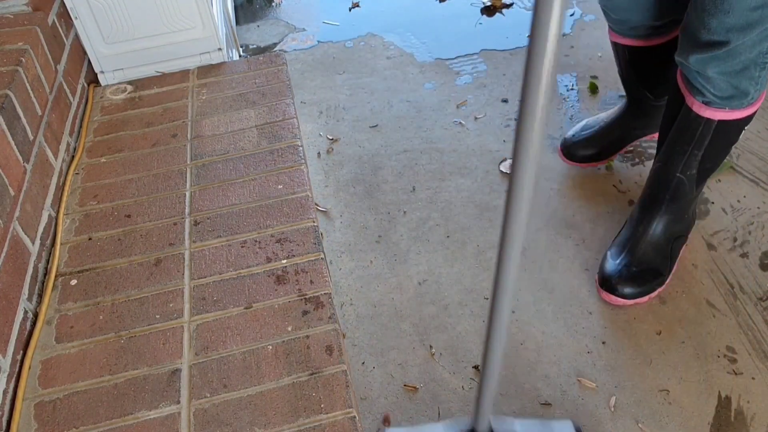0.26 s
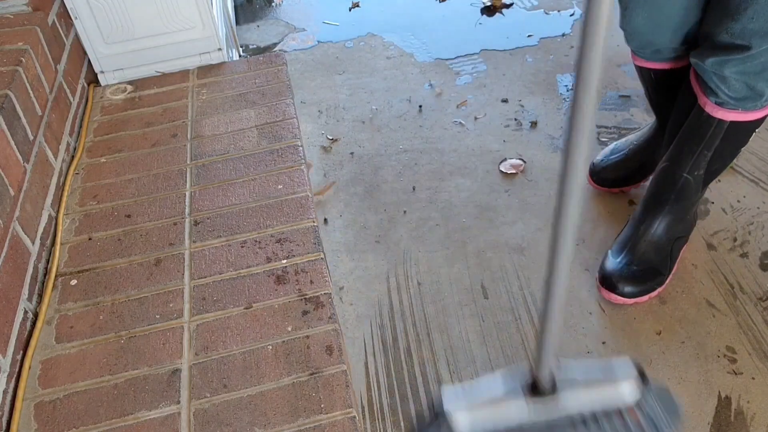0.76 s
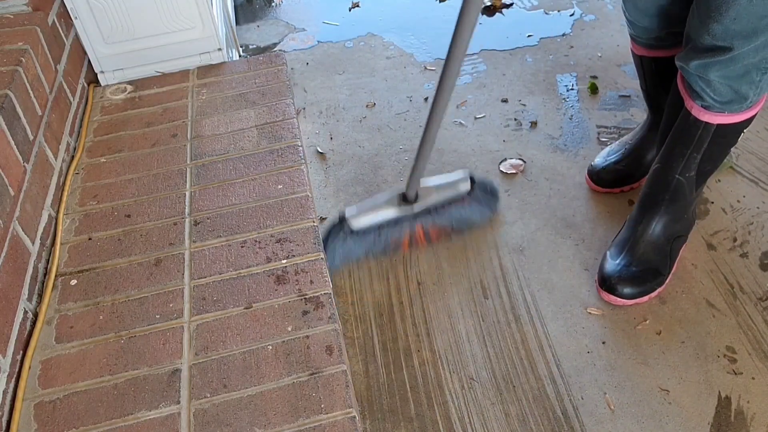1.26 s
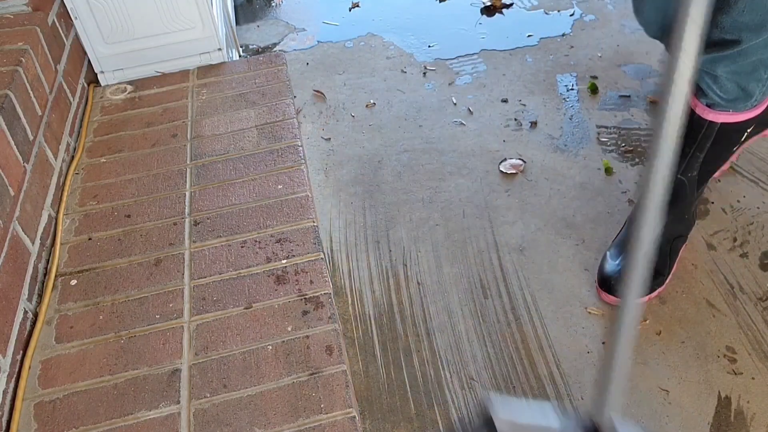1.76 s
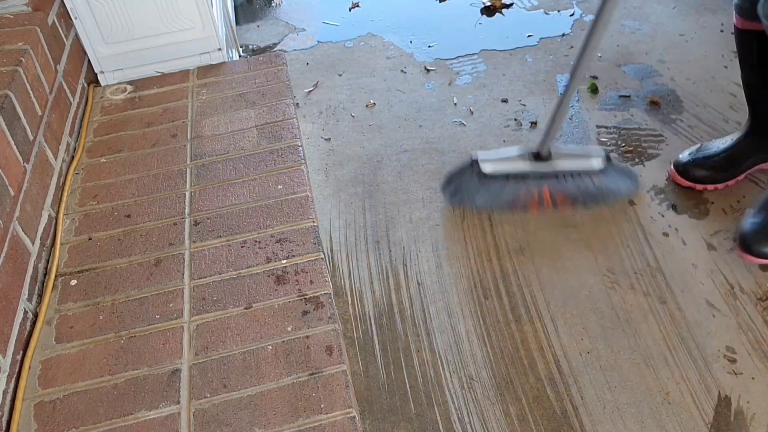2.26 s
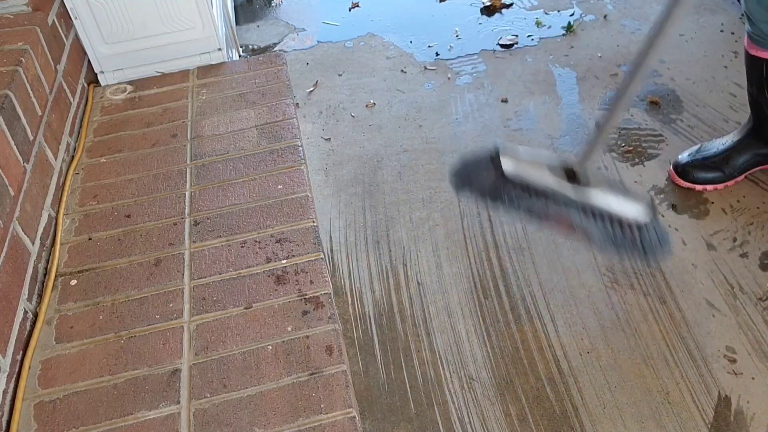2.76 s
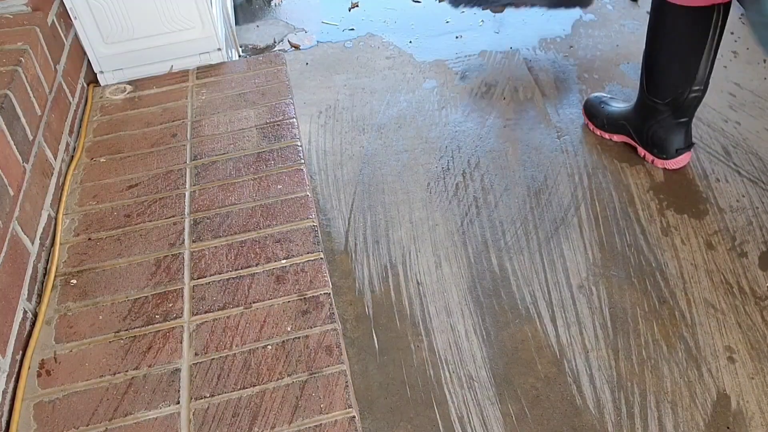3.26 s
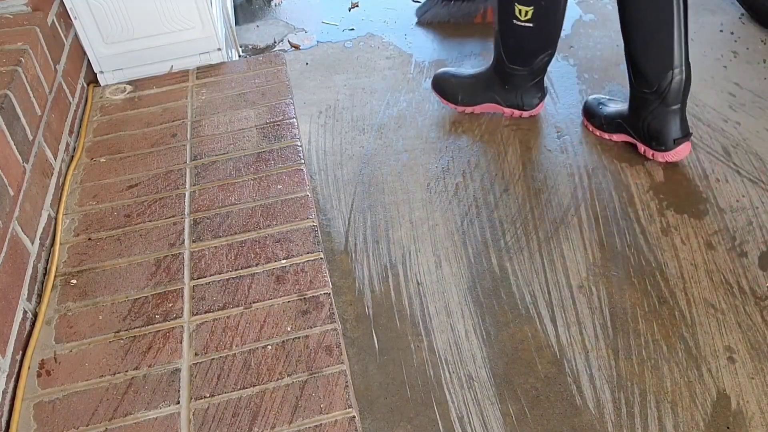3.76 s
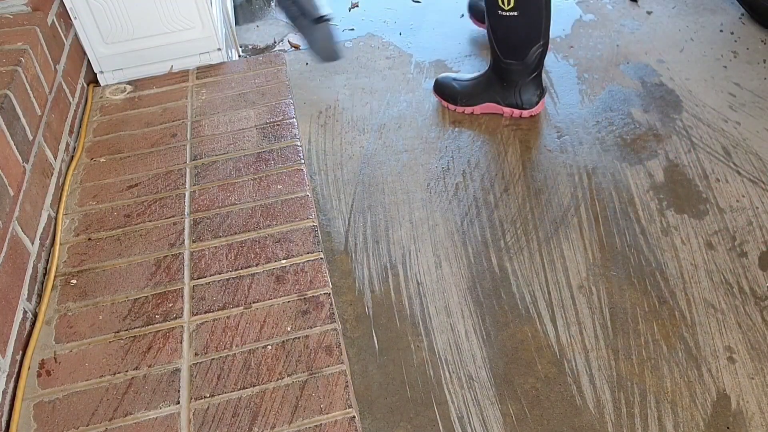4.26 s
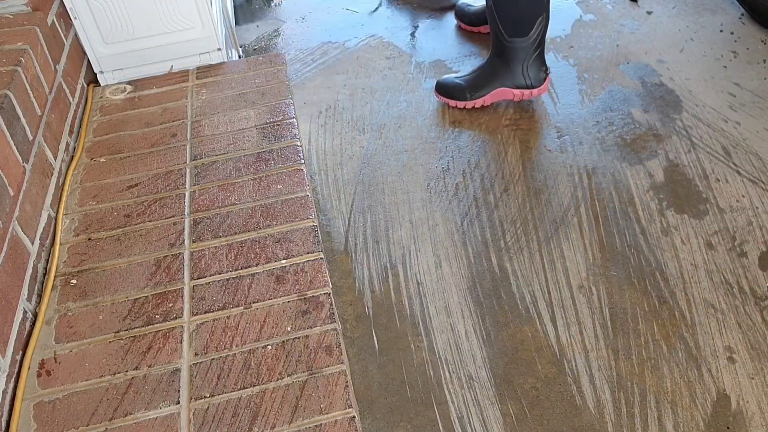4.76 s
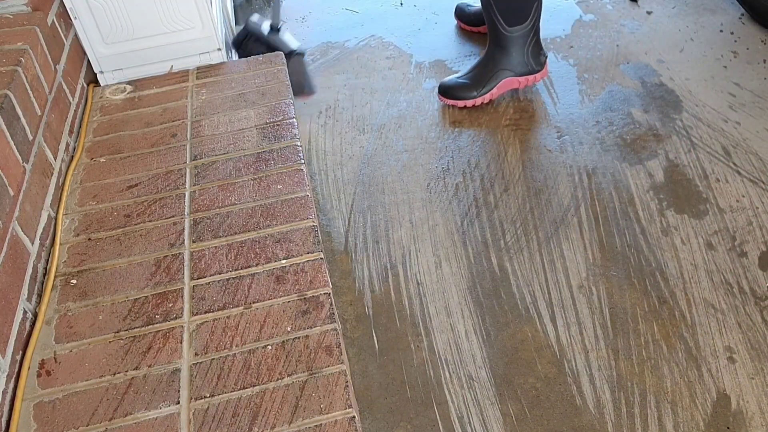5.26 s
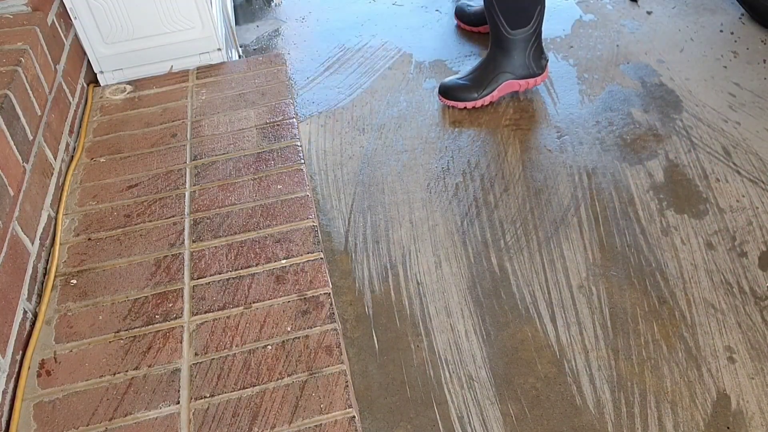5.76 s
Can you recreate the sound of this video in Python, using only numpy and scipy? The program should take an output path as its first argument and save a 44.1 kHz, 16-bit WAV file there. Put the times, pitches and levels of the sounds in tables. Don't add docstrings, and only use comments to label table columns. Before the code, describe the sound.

A push broom sweeps water across a concrete patio, heard close in stereo with short wall reflections. Quiet water drips and low outdoor rumble open it; at 0.4 s bristles land and hiss, swelling until 0.85 s, with a hollow squeaky groan around 0.55 s. The second stroke starts near 1.3 s: the head hits a brick edge, peaking at 1.4 s in a sharp boxy clack, leaning left, with a fast rattle dying by 1.55 s as the scrape continues to 1.7 s. Drops flick around 2.0-2.3 s. A stroke at 2.35 s leads to a bright splash at 2.6 s and another swish, then scattered drops. The sound vanishes for a blink at 3.23 s, returning on a scrape fading by 3.65 s. Another wet stroke runs 3.9-4.3 s with ringing bubbles. A swish from 4.7 s bursts into a strong bubbly splash at 5.1 s. Soft drips, dull thuds around 5.65-5.8 s and a final rising swish close it.

```python
import sys
import numpy as np
from scipy import signal
from scipy.fft import rfft, irfft
from scipy.io import wavfile
from scipy.ndimage import uniform_filter1d

SR = 44100
rng = np.random.default_rng(int(sys.argv[2]) if len(sys.argv) > 2 else 0)


def bounce(signal):
    frames = np.transpose(np.atleast_2d(signal))
    limited = np.clip(frames, -1, 1)
    pcm = np.round(limited * 32767).astype(np.int16)
    wavfile.write(sys.argv[1], SR, pcm)


def voltage_ratio(level):
    return 10 ** (np.asarray(level, float) / 20)


N = 264600

# touch_s, fastest_s, lift_s, hiss_db, slower_ends_db
STROKES = [(0.395, 0.722, 0.84, -44, 7.5), (1.336, 1.53, 1.714, -46, 3.5), (2.352, 2.447, 2.73, -45, 7.5),
           (2.632, 2.686, 2.855, -43, 12.5), (3.25, 3.265, 3.64, -45.5, 31),
           (3.914, 4.126, 4.313, -45.5, 13.5), (4.156, 4.177, 4.186, -49.5, 1.5),
           (4.31, 4.365, 4.395, -52.5, 2.5), (4.728, 5.077, 5.325, -41.5, 21.5),
           (5.11, 5.22, 5.18, -51.5, 22), (5.73, 6.003, 6.54, -42.5, 5.5)]
# start_s, end_s, hiss_db
TRICKLE = [(-.1, 0.373, -71.5), (0.926, 1.301, -65.5), (1.805, 2.3, -69), (2.86, 3.157, -63.5),
           (1.74, 1.79, -62), (3.487, 3.589, -77.5), (3.6, 3.84, -77), (3.846, 3.901, -70.5),
           (4.45, 4.722, -74), (5.28, 5.552, -66), (5.652, 5.668, -55.5)]
# freq_hz, level_db (per Hz)
BRISTLE_COLOUR = [(1120, -23.5), (1900, -15.5), (2400, -14.5), (2660, -17), (3300, -8), (4650, -4.5),
                  (7650, -4.5), (10800, -6), (14900, -2.5), (16100, -6), (16500, -26)]
# freq_hz, left_right_likeness (0 to 1)
HEAD_LIKENESS = [(1000, 0.3), (3000, 0.85), (6000, 0.13), (15000, 0.11)]
# time_s, spray_db (off the bristle tips), wave_db (heaped in front)
WATER_DEPTH = [(0, 5.5, 6), (.33, 5.5, 5.5), (.39, 1.5, -8), (.8, -1.5, -8), (1, 2.5, 0), (1.45, -0.5, -4),
               (1.75, -5, -8), (2.2, 6, 6), (2.45, 0, -11.5), (2.8, 0, -6.5), (2.9, 3.5, -1), (3.2, 3.5, 0),
               (3.3, 1.5, -13), (4.08, 0, -13), (4.16, 3, -1.5), (4.27, 7, 5), (4.4, 4.5, 0),
               (4.9, 3, -9.5), (5.2, 5, -5.5), (5.8, 3, -12.5)]
# freq_hz, level_db, t60_s
HUM_MODES = [(1452, -17, 0.08), (1550, -4, 0.075), (1640, -13, 0.08)]
# peak_s, level_db, fall_s (time to lose 10 dB)
PRESSES = [(.385, -58, 0.017), (.44, -59.5, 0.04), (.55, -51, 0.028), (.635, -57, 0.016),
           (.72, -60.5, 0.12), (1.31, -58, 0.036), (1.372, -44, 0.026), (1.44, -52.5, 0.077),
           (1.716, -65.5, 0.088), (2.262, -54.5, 0.013), (2.47, -67, 0.088), (2.6, -63, 0.16),
           (2.77, -63, 0.091), (3.275, -56.5, 0.032), (3.4, -68, 0.1), (3.88, -69, 0.036),
           (3.92, -62, 0.032), (3.967, -57.5, 0.025), (4.03, -70, 0.044), (4.79, -63, 0.017),
           (4.825, -66, 0.028), (4.95, -68, 0.21)]
# time_s, pitch_hz
SQUEAK = [(.4, 1530), (.52, 1550), (.6, 1560), (.64, 1510), (.8, 1580), (1.27, 1545), (1.35, 1480),
          (1.4, 1580), (1.47, 1650), (1.55, 1540), (2.3, 1550), (3.3, 1555), (3.86, 1500), (3.92, 1525),
          (3.97, 1555), (4.04, 1505), (4.8, 1550), (6, 1550)]
# peak_s, level_db, fall_s (time to lose 10 dB), pitch_hz
GROANS = [
    (.548, -54, .035, 590),
    (.55, -64, .025, 670),
    (.556, -45, .026, 1546),
    (.597, -50, .018, 1549),
    (1.3, -56, .025, 1545),
    (3.965, -56, .03, 1550),
]
# start_s, peak_db, pitch_hz,
# t60_s, ring_over_spray_db
FLICKS = [(.296, -58, 10300, .03, 12), (.369, -41, 7300, .06, 0), (0.376, -35, 13500, 0.06, -5),
          (.425, -43, 7400, .15, 14), (.449, -38, 4470, .05, 12), (.483, -37, 7000, .07, 10),
          (0.96, -44, 11900, 0.038, -12), (1.0145, -47, 3670, 0.039, -4), (1.129, -41.5, 4640, 0.11, 3),
          (1.316, -43, 7700, 0.069, -12), (1.8702, -46, 2880, 0.052, 1), (2.0203, -37.5, 5350, 0.033, -10),
          (2.069, -55, 4260, .085, 0), (2.113, -44.5, 7100, 0.037, -27), (2.254, -39, 8000, .04, -10),
          (2.258, -33.5, 11600, 0.088, -13), (2.356, -52, 6630, .064, -4), (2.585, -45, 1600, .1, 14),
          (2.73, -50, 1500, .1, 14), (2.838, -35, 7150, 0.12, -15), (2.921, -33, 5600, 0.035, 10),
          (2.937, -39, 5720, .06, 11), (3.048, -58, 6000, 0.057, -1), (3.0674, -50, 5610, 0.055, 0),
          (3.12, -38.5, 5980, 0.059, -15), (4.31, -37.5, 4800, 0.07, 9), (4.4783, -47, 5850, 0.17, -6),
          (4.716, -49, 3050, .04, 16), (5.07, -44, 1550, .16, 16), (5.1, -47, 1300, .1, 18),
          (5.377, -47.5, 6000, .06, 3), (5.443, -45, 7200, .09, 8), (5.51, -52, 6000, .15, 16),
          (5.63, -50, 2500, .05, 14), (5.654, -44.5, 2300, .04, 14), (5.678, -43.5, 2200, .06, 14),
          (5.639, -50, 4000, .06, -7), (5.6452, -36.5, 4020, 0.11, -7)]
# start_s, peak_db, pitch_hz, t60_s, ring_over_spray_db
SPLASHES = [(2.55, -30, 7400, 0.16, -16), (2.563, -27, 5000, .12, -8), (2.578, -21.5, 8700, 0.086, -11),
            (2.591, -19, 5000, 0.059, -6), (2.586, -23, 5500, 0.068, 1), (2.597, -21, 6030, 0.033, 3),
            (2.58, -44.5, 2120, 0.092, 13), (2.676, -45, 2150, 0.23, 16), (2.67, -38, 4300, .25, 12),
            (2.676, -31.5, 6300, 0.085, 9), (2.684, -29.5, 7400, 0.073, 9), (2.855, -38, 3900, 0.2, 4),
            (4.099, -40, 5700, 0.17, 13), (4.147, -41, 2100, 0.1, 17), (4.175, -38.5, 3340, 0.18, 12),
            (4.211, -41, 3100, 0.18, 16), (4.24, -34.5, 5730, 0.08, 12), (4.252, -36, 4200, 0.12, 9),
            (4.3, -47, 2190, 0.15, 14), (4.312, -48.5, 1570, 0.1, 19), (4.34, -40.5, 5600, 0.26, 16),
            (4.348, -37.5, 7800, 0.18, 19), (5.004, -28, 6540, 0.09, 10), (5.006, -30.5, 7700, 0.27, 20.5),
            (5.02, -36, 5200, .15, 7), (5.044, -27.5, 7600, .12, 12), (5.048, -25, 5250, 0.1, 13),
            (5.057, -26.5, 7550, 0.04, 14), (5.059, -19, 5000, 0.042, 14), (5.05, -35, 2280, 0.13, 12),
            (5.075, -32, 3330, 0.18, 19), (5.095, -38, 2380, 0.076, 17), (5.0971, -17, 6100, 0.016, 11),
            (5.107, -26, 5500, .03, 18), (5.123, -31.5, 5270, .06, 12), (5.2, -37, 5500, .04, 14),
            (5.262, -47, 3050, .03, 19), (5.24, -44, 3100, 0.4, 11), (5.36, -56, 5200, 0.08, 15)]
# start_s, peak_db, upper_over_lower_modes_db, rise_s, main_mode_hz
KNOCKS = [(1.3408, -17, -8, 0.00078, 1440), (1.344, -28, 13, 0.0019, 1460), (1.3473, -30, 8, 0.0019, 1560),
          (1.353, -32, 4, 0.0021, 1430), (1.359, -33, 0, 0.0022, 1480), (1.3645, -26, -1, 0.002, 1500),
          (1.3719, -24, 15, 0.0011, 1514), (1.3813, -30, -6, 0.0015, 1570),
          (1.387, -30.5, 13, 0.0015, 1570), (1.392, -30.5, 10, .0015, 1565),
          (1.396, -26.5, 16, 0.0022, 1606), (1.4032, -19.5, -2.5, 0.00055, 1555),
          (1.4057, -8, 18.5, .0012, 1543), (1.409, -16, 14, 0.00084, 1567), (1.4205, -26, 18, 0.0013, 1704),
          (1.434, -26, 6.5, 0.001, 1500), (1.4395, -30, 11, 0.0013, 1690),
          (1.4523, -32.5, 16, 0.0015, 1658), (1.4564, -28.5, 14, 0.0013, 1635),
          (1.467, -33, 19, 0.0025, 1680), (1.471, -33, -8, 0.0015, 1540), (1.482, -40, 12.5, 0.0023, 1610),
          (1.494, -37.5, 13, 0.0029, 1495), (1.503, -43, 14, .003, 1560), (1.516, -41, 16, 0.0029, 1660),
          (1.529, -42, 16, .003, 1570), (1.545, -47, 17, .004, 1610), (4.77, -48, 0, 0.0023, 1600),
          (5.664, -45, -4, 0.0023, 1600), (5.671, -49, 0, .002, 1760)]
# freq_hz, level_db, t60_s
HEAD_MODES = [(170, -14, 0.047), (276, -16, 0.037), (425, -11, 0.057), (527, -20, 0.027), (650, 0, 0.028),
              (740, 0, 0.018), (883, -3, 0.026), (1000, -4, 0.022), (1175, -14, 0.014), (1370, -18, 0.025),
              (1555, 3, 0.03), (1650, -4.5, .022), (1795, -15.5, 0.038), (1922, -12, 0.03),
              (2217, -23, 0.029), (2620, -18, 0.03), (3130, -18, 0.017), (3350, -22, .02),
              (3840, -20, 0.047), (4320, -26.5, 0.027), (5000, -28.5, 0.011), (5600, -20.5, 0.018)]
# start_s, peak_db, pitch_hz
THUDS = [(0.459, -45, 177), (.523, -44, 199), (1.15, -48, 422), (1.344, -31, 425), (1.351, -34, 400),
         (1.37, -39, 400), (1.42, -39, 392), (3.109, -43, 167), (4.089, -55.5, 175.4), (4.149, -44, 200),
         (4.201, -49, 171), (4.759, -46, 503), (4.767, -50.5, 400), (5.478, -53, 330), (5.525, -53, 350),
         (5.642, -44, 560), (5.664, -46, 820), (5.68, -48, 650), (5.646, -40, 139.8), (5.654, -41.5, 526),
         (5.659, -34, 188), (5.676, -43, 192), (5.693, -46, 200), (5.71, -41, 170), (5.732, -57, 587),
         (5.735, -45, 81), (5.758, -31, 67.6), (5.791, -43, 71.6)]
# time_s, left_over_right_db
PAN = [(0, 1.5), (1.3, 1), (1.36, 8), (1.5, 1), (2.5, .5), (2.6, 4.5), (2.7, 0.5), (4.4, 0.5), (6, 1)]
# time_s, lag_samples
LAG = [(0, 5), (1, 8), (2, 7), (3.2, 7), (3.3, 5), (4.3, 4), (4.7, 0), (6, -1)]
# freq_hz, t60_s
WALLS = [(200, 0.17), (1000, 0.32), (4000, 0.14), (12000, 0.058)]
# peak_s, level_db, fall_s (time to lose 10 dB)
GUSTS = [(.05, -52, 0.4), (.14, -45, 0.24), (.3, -44.5, 0.04), (.5, -45, 0.15), (.72, -74, 3.5),
         (.82, -53.5, 0.4), (.97, -44, -0.25), (1.35, -54.5, 0.5), (1.55, -49, 0.2), (1.71, -46, 0.15),
         (1.87, -51.5, 0.27), (2.09, -49, 0), (2.2, -48.5, 0.16), (2.39, -45, -0.19), (2.51, -52.5, 0.17),
         (2.76, -49.5, 0.17), (3.2, -49, 0.36), (3.4, -56, 0.6), (3.63, -59, 0.5), (3.81, -56.5, 0.4),
         (4.3, -53.5, 0.37), (4.7, -56, 0.24), (4.86, -50.5, 0.3), (5.31, -48.5, 0.22), (5.55, -71, 2),
         (5.67, -55, 0.14), (5.78, -44.5, 0.27), (5.89, -60, -2.5)]
# freq_hz, level_db (per Hz)
RUMBLE_COLOUR = [(8.8, -41), (15, -19), (32, -9), (54, 8.5), (108, -5.5), (135, -10.5), (200, -20.5),
                 (260, -29.5), (440, -120)]
# freq_hz, level_db (per Hz)
WASH_COLOUR = [(76, -29), (130, -5), (162, -19.5), (199, -10.5), (281, -6), (324, -1), (457, -12),
               (516, -6), (860, -11), (1120, -17.5), (1450, -14.5), (1780, -15.5), (3680, -17),
               (15200, -40.5), (16500, -52)]
# freq_hz, left_right_likeness (0 to 1)
YARD_LIKENESS = [(60, .55), (180, .58), (550, .45), (1650, .1), (5000, .1), (15000, .1)]
# freq_hz, left_over_right_db
TILT = [(40, 1), (300, -1.5), (600, -1), (2000, 0.5), (8000, -0.5), (13000, 2)]
# start_s, end_s
DROPOUT = (3.222, 3.2625)


def sweep():
    bristles = voltage_ratio(4.8) * noise(BRISTLE_COLOUR, HEAD_LIKENESS, patchy_db=1.7, flicker_db=1.0)
    bristle_ring = voltage_ratio(-9.0) * bubbles(7150, 7610, 70, 120, 3.0, drift=.008, count=3)
    return contact() * (bristles + bristle_ring + pushed_water()) + ports(head_hum())


def contact():
    land_db_per_s, lift_db_per_s, drain_db_per_s = 702, 246.5, 119
    t = np.arange(0, N, 16) / SR
    power = 1e-9
    for touch, fastest, lift, db, ends_db in STROKES:
        slowness = np.interp(t, [touch, fastest, lift], [1, 0, 1])
        away_db = land_db_per_s * np.maximum(touch - t, 0) + lift_db_per_s * np.maximum(t - lift, 0)
        power = power + voltage_ratio(2 * (db - ends_db * slowness ** 1.044 - away_db))
    for start, end, db in TRICKLE:
        away_db = land_db_per_s * np.maximum(start - t, 0) + drain_db_per_s * np.maximum(t - end, 0)
        power = power + voltage_ratio(2 * (db - away_db))
    return np.interp(np.arange(N) / SR, t, np.sqrt(power))


def pushed_water():
    fizz = np.sqrt(np.maximum(voltage_ratio(2 * along(WATER_DEPTH)) - voltage_ratio(2 * 0.5), .002))
    slosh = np.sqrt(np.maximum(voltage_ratio(2 * along(WATER_DEPTH, column=2)) - voltage_ratio(2 * -8.5), .001))
    small = bubbles(3565, 9290, 45, 3000, 3.1, count=12)
    big = bubbles(1300, 5847, 24, 1500, 3.2, count=12)
    return fizz * small + slosh * big


def bubbles(low_hz, high_hz, cycles, per_s, spread_db, drift=.05, count=20):
    out = np.zeros((2, N))
    size = voltage_ratio(spread_db * np.minimum(rng.exponential(1, N), 4)) * (rng.random(N) < per_s / SR)
    kind = rng.integers(0, count, N)
    places = rng.integers(-5, 6, count)
    share = signal.windows.tukey(count + 2, .95)[1:-1]
    for k, hz in enumerate(np.geomspace(low_hz, high_hz, count)):
        age = np.arange(1400) / SR * hz / cycles
        ring = (1 - np.exp(-12 * age)) * np.exp(-3 * age)
        ring *= np.sin(2 * np.pi * cycles * age * (1 + 0.016 * age))
        ring = share[k] * ring / np.linalg.norm(ring)
        pops = signal.oaconvolve(np.float32(size * (kind == k)), np.float32(ring))[:N]
        out += [pops, np.roll(pops, places[k])]
    n = np.arange(N)
    warp = n.astype(float)
    for hz in (2.3, 5.9, 9.1):
        warp += drift * SR / (2 * np.pi * hz) * np.sin(2 * np.pi * (hz * n / SR + rng.random()))
    left, right = [np.interp(warp, n, side) for side in out]
    return evened(np.array([left, ports(right)[1]]))


def head_hum():
    unevenness = evened(uniform_filter1d(rng.standard_normal(N), 600))
    scrape = voltage_ratio(2.3 * unevenness) * rng.standard_normal(N)
    t = np.arange(3000) / SR
    ring = sum(voltage_ratio(db - 60 * t / t60) * np.sin(2 * np.pi * hz * t) for hz, db, t60 in HUM_MODES)
    hum = evened(signal.oaconvolve(scrape, ring)[:N])
    hum /= np.sqrt(abs(uniform_filter1d(hum ** 2, 1200)) + .5)
    wander = 1 + .003 * evened(uniform_filter1d(scrape, 900) - uniform_filter1d(scrape, 6000))
    clock = np.float32(np.cumsum(wander) / SR)
    squeak = np.sin(2 * np.pi * np.cumsum(along(SQUEAK) * wander) / SR)
    out = (voltage_ratio(-2) * hum + voltage_ratio(-3.5) * squeak) * swells(PRESSES, lean=1.04)
    for s, db, fall_s, hz in GROANS:
        out += swells([(s, db, fall_s)], lean=0.88) * np.sin(np.float32(2 * np.pi * hz) * clock)
    return out


def flicks():
    return thrown_water(FLICKS, pitch_width=0.21, rise_s=.003)


def splashes():
    return thrown_water(SPLASHES, pitch_width=0.17, rise_share=0.042)


def thrown_water(rows, pitch_width, rise_s=0, rise_share=0):
    out = np.zeros((2, N))
    t = np.arange(6144) / SR
    hz = np.fft.rfftfreq(6144, 1 / SR)
    for s, db, pitch_hz, t60, ring_db in rows:
        spray = rng.standard_normal((2, 6144))
        lumps = voltage_ratio(3.0 * evened(uniform_filter1d(spray[1, :len(hz)], 36)))
        patch = np.exp(-(np.log((hz + 1) / pitch_hz) / pitch_width) ** 2)
        colour = voltage_ratio(read(BRISTLE_COLOUR, hz)) + voltage_ratio(ring_db) * patch * lumps
        rise = max(rise_s + rise_share * t60, 2e-4)
        shape = (1 - np.exp(-(t / rise) ** 2)) * voltage_ratio(-60 * t / max(t60, .01))
        spray[1] = 0.065 * np.roll(spray[0], round(lag_at(s))) + 0.9 * spray[1]
        burst = evened(irfft(rfft(spray) * colour))
        add(out.T, s, (voltage_ratio(db - 7.5) * shape / shape.max() * burst).T)
    return out


def knocks():
    out = np.zeros((2, N))
    t = np.arange(2000) / SR
    hz, db, t60 = np.transpose(HEAD_MODES)[:, :, None]
    for s, peak_db, hard_db, rise, main_hz in KNOCKS:
        luck = rng.standard_normal((4, len(HEAD_MODES), 1))
        hardness_db = .5 * hard_db * np.tanh((hz - 1250) / 250)
        level = voltage_ratio(db + 1.24 * luck[0] + hardness_db - 60 * t / t60)
        detune = np.where(abs(hz - 1600) < 250, main_hz / 1555, 1 + .02 * luck[1])
        late = (7 + 4 * luck[2] * (hz > 1800)) / SR
        smear = 900 * max(rise - .0008, 0) * luck[3]
        sides = []
        for delay in (0, late):
            modes = level * np.sin(2 * np.pi * hz * detune * (t - delay) + smear)
            sides.append(modes.sum(0))
        rise = max(rise, 2e-4)
        ring = np.array(sides) * (1 - np.exp(-(t / rise) ** 2))
        crack = .8 * uniform_filter1d(rng.standard_normal((2, len(t))), size=5, axis=1)
        crack *= np.exp(-t / 0.007) * min(0.0012 / rise, 1)
        add(out.T, s, voltage_ratio(peak_db) * (ring / abs(ring[0]).max() + .19 * crack).T)
    return out


def thuds():
    out = np.zeros(N)
    t = np.arange(4096) / SR
    hz = np.fft.rfftfreq(4096, 1 / SR)
    for s, db, pitch_hz in THUDS:
        puff = rng.standard_normal(4096)
        puff = evened(irfft(rfft(puff) / (1 + (hz / 600) ** 1.2) * (hz > 120)))
        bump = np.sin(2 * np.pi * pitch_hz * t) + 0.3 * min(pitch_hz / 170, 1) ** 3 * puff
        fade = (1 - np.exp(-t / 0.00075)) * np.exp(-t / 0.016)
        add(out, s, voltage_ratio(db - 2.5) * fade * bump)
    return out


def patio(x):
    taps = np.zeros((6, 16000))
    at = np.arange(100, 15900, 20) + rng.integers(0, 20, (6, 790))
    np.put_along_axis(taps, at, rng.choice([-1., 1.], at.shape), 1)
    hz, t, z = signal.stft(taps, SR, nperseg=256)
    z = z * voltage_ratio(-60 * t / read(WALLS, hz)[:, None])
    tail = signal.istft(z, SR, nperseg=256)[1][:, :10000]
    tail = np.float32(tail / np.linalg.norm(tail[0]))
    phase = 7 * np.arange(N) / SR + np.arange(3)[:, None] / 3
    turns = np.cos(2 * np.pi * phase) * np.sqrt(2 / 3)
    sent = np.float32(np.tile(x * turns, (2, 1)))
    echo = signal.oaconvolve(sent, tail, axes=1)[:, :N]
    return echo.reshape(2, 3, N).sum(1)


def yard():
    rumble = noise(RUMBLE_COLOUR, YARD_LIKENESS, patchy_db=1.5, flicker_db=0, size=2048)
    rumble /= np.sqrt(uniform_filter1d((rumble ** 2).mean(0), 3000) + 0.23)
    gusts = np.hypot(swells(GUSTS, lean=1.43), voltage_ratio(-62.5))
    wash = noise(WASH_COLOUR, YARD_LIKENESS, patchy_db=2.1, flicker_db=1.0, size=1024)
    return gusts * rumble + voltage_ratio(-58.5) * wash


def noise(colour, likeness, patchy_db, flicker_db, size=512):
    frames = N * 4 // size + 5
    hz = np.fft.rfftfreq(size, 1 / SR)
    a, b, c, d, patches = rng.standard_normal((frames, len(hz), 5)).T
    patches = evened(uniform_filter1d(uniform_filter1d(patches, 8, 0), 12, 1))
    flicker = evened(uniform_filter1d(rng.standard_normal(frames), 3))
    lag_samples = lag_at(np.arange(frames) * size / 4 / SR)
    late = np.exp(-2j * np.pi * np.outer(hz / SR, lag_samples))
    same = np.clip(read(likeness, hz), -1, 1)[:, None]
    left = a + 1j * b
    z = np.array([left, same * late * left + np.sqrt(1 - same ** 2) * (c + 1j * d)])
    z *= voltage_ratio(read(colour, hz)[:, None] + patchy_db * patches + flicker_db * flicker)
    sound = signal.istft(np.complex64(z), nperseg=size, noverlap=size * 3 // 4)[1]
    return evened(sound[:, :N])


def ports(x):
    n = np.arange(N)
    heard = n - np.round(lag_at(n / SR)).astype(int)
    return np.array([x, x[np.clip(heard, 0, N - 1)]])


def lag_at(s):
    return np.interp(s, *np.transpose(LAG))


def swells(rows, lean):
    s, db, fall_s = np.transpose(rows)[:, :, None]
    n = np.arange(0, N, 64)
    since = (n / SR - s) / np.maximum(fall_s, .01)
    away = np.where(since < 0, -lean * since, since)
    power = voltage_ratio(2 * (db - 10 * away ** 1.43)).sum(0)
    return np.sqrt(np.interp(np.arange(N), n, power))


def along(curve, column=1):
    columns = np.transpose(curve)
    return np.interp(np.arange(N) / SR, columns[0], columns[column])


def evened(x):
    return x / np.sqrt(np.mean(x ** 2) + 1e-20)


def read(points, hz):
    f, value = np.transpose(points)
    return np.interp(np.log(hz + 1), np.log(f + 1), value)


def add(mix, s, sound):
    part = mix[round(s * SR):][:len(sound)]
    part += sound[:len(part)]


def scene():
    sides = np.array([[.5], [-.5]])
    thrown = np.nan_to_num(flicks()) + np.nan_to_num(splashes())
    water = voltage_ratio(sides * along(PAN)) * (np.nan_to_num(sweep()) + thrown)
    blows = np.nan_to_num(knocks())
    near = voltage_ratio(-0.37) * water + blows * voltage_ratio([[2.1], [1.4]]) + ports(thuds())
    echo = patio(voltage_ratio(-6.5) * water[0] + voltage_ratio(-13.5) * blows[0])
    return near + echo + np.nan_to_num(yard())


def low_pass(x):
    return signal.sosfilt(signal.butter(12, 15880, fs=SR, output="sos"), x)


def record(dry):
    tilt_db = read(TILT, np.fft.rfftfreq(N, 1 / SR))
    coloured = irfft(rfft(dry) * voltage_ratio(np.array([[.5], [-.5]]) * tilt_db), N)
    t = np.arange(N) / SR
    start, end = DROPOUT
    open_gate = np.clip(np.maximum(start - t, t - end) / 0.00061, 0, 1)
    treble_cut = signal.firwin(1023, 15800, window=("kaiser", 9), fs=SR)
    mix = signal.oaconvolve(coloured * open_gate, treble_cut[None], "same")
    return low_pass(mix)


dry = scene()
out = record(dry)
bounce(out)
```